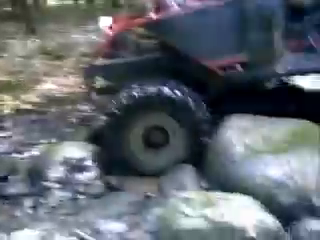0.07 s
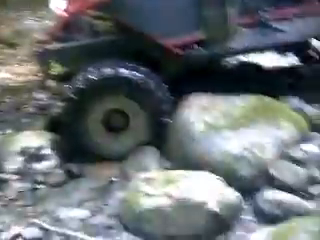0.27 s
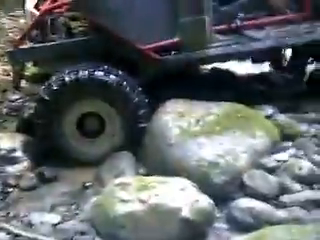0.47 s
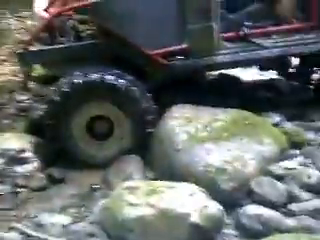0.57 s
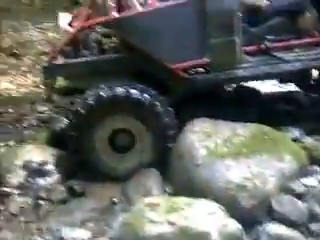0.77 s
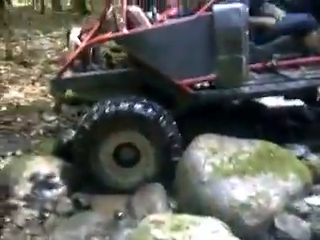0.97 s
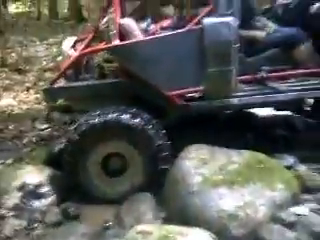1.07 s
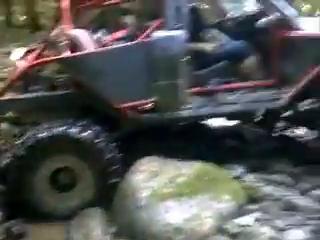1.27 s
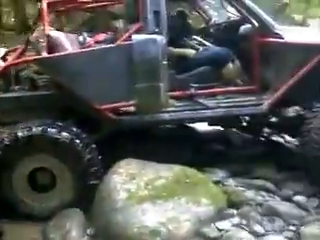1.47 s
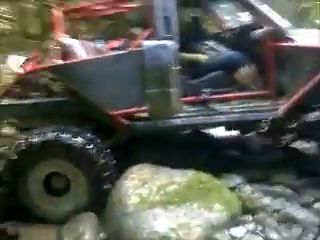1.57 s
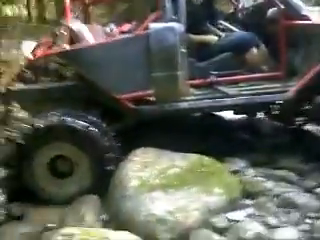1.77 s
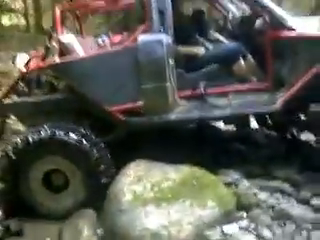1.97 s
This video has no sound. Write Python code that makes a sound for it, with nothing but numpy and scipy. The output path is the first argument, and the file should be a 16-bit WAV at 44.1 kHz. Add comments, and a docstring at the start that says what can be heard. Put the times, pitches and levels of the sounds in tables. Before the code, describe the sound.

Off-road buggy engine gives two deep throaty revs, drops to a low idle, then picks up slightly

```python
"""The exhaust of an eight-cylinder off-road buggy, blipped twice, dropping to idle and picking up again.
Harmonics locked to the firing rate give the note; two banks firing in uneven order add a beat, and random
differences between firings add rumble. Gas roar and clatter are noise pulsed by the firings; body resonances, a
loose metal part and panels are decaying modes set ringing by impacts. Behind them runs a steady wash of fan,
belts and gears with a few narrow-band tones, the lowest a ring of the exhaust pipe."""
import sys
import numpy as np
from scipy import signal
from scipy.fft import rfft, irfft, next_fast_len
from scipy.io import wavfile
from scipy.ndimage import uniform_filter1d, map_coordinates

SR = 44100
rng = np.random.default_rng(int(sys.argv[2]) if len(sys.argv) > 2 else 0)


def materialize(psi):
    """Save the field psi as 16-bit PCM at rate SR to the path in sys.argv[1].

    A 1-D psi becomes a single channel; in a 2-D psi each row is a channel.
    """
    bounded = np.clip(np.atleast_2d(psi).T, -1, 1)
    quanta = np.round(bounded * 32767).astype(np.int16)
    wavfile.write(sys.argv[1], SR, quanta)


N = 88420
MAX_FIRINGS = 400  # random values drawn per firing, more than the scene needs

# Engine speed and exhaust: t/s, firing rate f/Hz, mean rms level of the note/dB
ENGINE_COURSE = [(0.03, 87.24, -7.5), (0.122, 88.16, -12), (0.204, 90.1, -11), (0.232, 86.77, -13.5),
                 (0.364, 67.3, -29), (0.392, 64.42, -27), (0.446, 67.95, -16), (0.512, 81.26, -8.5),
                 (0.528, 83.53, -11), (0.65, 94.9, -10.5), (0.758, 103.4, -10.5), (0.808, 102.5, -12),
                 (0.868, 95.47, -12.5), (0.928, 83.7, -20.5), (1.022, 63.9, -23.5), (1.06, 58.7, -31),
                 (1.208, 51.2, -33), (1.296, 48.6, -31.5), (1.406, 51.2, -29.5), (1.648, 51.66, -29),
                 (1.802, 65.9, -25), (1.856, 70.9, -25), (2.0, 76.0, -29.5)]
# Broadband sources, relative levels: t/s, rumble/dB, roar under load/dB, clatter/dB
NOISE_COURSE = [(0, -30, -24, -43), (.13, -33, -27, -42), (.2, -21.5, -28.5, -46.5), (.3, -23.5, -35, -50),
                (.4, -25.5, -39, -49.5), (.45, -25, -25.5, -41), (.53, -25, -24.5, -38),
                (.72, -28, -26, -40), (.78, -22.5, -30.5, -43.5), (.9, -24, -31, -48),
                (1.03, -24.5, -40.5, -51.5), (1.2, -28, -48.5, -53), (1.45, -25.5, -46, -52),
                (1.54, -27, -39, -52), (1.64, -28, -32.5, -50.5), (1.72, -23.5, -41, -50.5),
                (2, -25, -41.5, -53)]
# Resonances of the body: f/Hz, half-width at half gain/Hz, peak gain added to a flat floor/dB
BODY_MODES = [(706, 50, -5), (1329, 520, -4.5), (1942, 190, -4.5)]
# Modes of a body panel: multiple of the pitch, mean level/dB, t60/s
PANEL_MODES = [(1, 0, 0.039), (.86, -5, 0.036)]


def exhaust():
    """Phase-locked harmonics superpose into one pressure dip per firing; uneven bank order adds subharmonics."""
    # Harmonics of the firing rate: t/s, second/dB, third/dB, beat of the banks/dB
    overtone_course = [(0, -33, -46, -20.5), (.25, -28.5, -45, -24), (.4, -30, -40, -24.5),
                       (.6, -30.5, -43, -22.5), (.85, -36, -48.5, -22.5), (1.0, -35, -43, -28),
                       (1.15, -35, -35, -34), (1.26, -40.5, -35, -33.5), (1.32, -29, -44, -32.5),
                       (1.47, -24.5, -32, -28), (1.62, -27, -34, -32), (1.72, -24, -30.5, -27),
                       (1.82, -27.5, -33.5, -30), (1.88, -32.5, -39, -29), (2, -33.5, -41.5, -32.5)]
    # Bank of each successive firing: left 1, right -1
    bank_order = [1, -1, -1, 1, -1, 1, 1, -1]
    # Filter the beat passes through: f/Hz, gain/dB
    pipe_response = [(30, -30.5), (58, -3), (100, -6.5), (140, -1.5), (168, 1), (200, -16), (400, -39.5)]
    note_waver_db, uneven_db, bank_scatter_db = 0.7, 1.56, 1.5
    slip_turns = 0.03  # phase wander, in turns of the firing cycle

    count, note_db = firings(), curves(ENGINE_COURSE)[1]
    second_db, third_db, beat_db = curves(overtone_course)
    hard_db = uneven_db * map_coordinates(rng.standard_normal(MAX_FIRINGS), [count], order=1)
    harmonics = [
        (1, note_db + note_waver_db * wobble(18)),
        (2, second_db + hard_db),
        (3, third_db + hard_db),
    ]
    pulses = np.zeros(N)
    for k, db in harmonics:
        turns = k * count + slip_turns * k * wobble(14)
        pulses -= amp(db) * np.cos(2 * np.pi * turns)
    scatter = amp(bank_scatter_db * rng.standard_normal(MAX_FIRINGS))
    banks = np.resize(bank_order, MAX_FIRINGS) * scatter
    beat = unit(coloured(kicks(banks), pipe_response))
    return np.sqrt(2) * pulses + amp(beat_db) * beat


def rumble():
    """Cycle-to-cycle variation: random firing impulses and noise excite the same low-pitched response."""
    # Response to thumps and wash: f/Hz, relative gain/dB
    rumble_response = [(30, -22), (48, -5.5), (70, -4), (110, -5.5), (165, -0.5), (200, -9.5), (260, -15.5),
                       (450, -34.5), (600, -61.5)]
    thumps = unit(coloured(kicks(rng.standard_normal(MAX_FIRINGS)), rumble_response))
    wash = unit(coloured(rng.standard_normal(N), rumble_response))
    return amp(curves(NOISE_COURSE)[0] - 3.0) * unit(thumps + 1.8 * wash)


def roar():
    """Amplitude-modulated flow noise, coloured by pipe and body, with brighter clatter of the running gear."""
    # Gas roar under load, before the body resonances: f/Hz, relative spectral density/dB
    roar_spectrum = [(150, -23), (220, 1.5), (280, 2), (400, 1), (520, -4), (704, -3), (900, -5),
                     (1300, -4), (1760, -9.5), (2230, -9), (2550, -5), (2860, -14.5), (3200, -21.5),
                     (4200, -51)]
    # Clatter: f/Hz, relative spectral density/dB
    clatter_spectrum = [(1710, -29), (2900, -2.5), (3320, -6.5), (3710, 1), (4530, -5), (5780, -6.5),
                        (6560, -11.5), (7100, -25), (9230, -47), (15600, -120)]
    _, roar_db, clatter_db = curves(NOISE_COURSE)
    rush = coloured(puffed(steady=1.4, scatter_db=2.5, cycle_db=1.0), roar_spectrum)
    rush = patchy(resonant(rush, BODY_MODES, floor=1), depth_db=2.5)
    clatter = coloured(puffed(steady=1.5, scatter_db=3, cycle_db=0.8), clatter_spectrum)
    clatter = patchy(clatter, depth_db=2.0)
    return amp(roar_db - 1.5) * unit(rush) + amp(clatter_db) * unit(clatter)


def shudder():
    """Impulsive excitation of modes: each firing, a little late, rings a body resonance, harder under load."""
    over_roar_db, spread_db = 2, 2.5
    pitch_spread = 0.079  # largest deviation, as a share of the pitch
    latest_s = 0.006
    at = np.flatnonzero(np.diff(np.floor(firings())))
    late, size, which, pitch = rng.random((len(at), 4)).T
    mode = (which * len(BODY_MODES)).astype(int)
    hz = np.transpose(BODY_MODES)[0][mode] * (1 + pitch_spread * (2 * pitch - 1))
    # The logarithm of a uniform draw makes a few firings much stronger than the rest
    db = curves(NOISE_COURSE)[1][at] + over_roar_db - spread_db * np.log(size + 0.0013)
    return struck(zip(at / SR + latest_s * late, db, hz), PANEL_MODES, tick=0.5)


def rattle():
    """Impact excitation: a loose metal part strikes the frame and body panels knock, each ringing in its modes."""
    # Strikes of the loose part: t/s, relative level/dB, pitch f/Hz
    rattle_strikes = [(0.001, -19.5, 2535), (0.0263, -15, 2490), (0.0372, -14, 2450), (0.0958, -16.5, 2467),
                      (0.1191, -15.5, 2425), (0.1303, -20, 2436), (.152, -24.5, 2450), (0.185, -24, 2560),
                      (0.4752, -19.5, 2524), (0.5337, -17.5, 2546), (.546, -21, 2500),
                      (0.5727, -19.5, 2560), (0.6068, -23, 2460), (0.6232, -17.5, 2520),
                      (0.6396, -23, 2600), (0.6645, -20, 2510), (0.7060, -19, 2559), (.7392, -24.5, 2449)]
    # Modes of the loose part: multiple of the pitch, mean level/dB, t60/s
    tin_modes = [(1, 3.5, 0.044), (1.06, -6, .025), (1.62, -10.5, 0.03)]
    # Knocks of the panels: t/s, relative level/dB, pitch f/Hz
    panel_knocks = [(0.0164, -8.5, 1407), (0.04, -18, 726), (0.1765, -19, 1394), (.187, -19.5, 700),
                    (0.4444, -17.5, 1384), (.4823, -19.5, 1244), (0.511, -13.5, 710), (0.539, -16.5, 698),
                    (.5467, -17.5, 1340), (0.569, -15.5, 1350), (0.5945, -15, 1288), (.6, -16.5, 744),
                    (0.627, -18.5, 680), (0.683, -15, 765), (0.709, -15.5, 1403), (1.544, -24.5, 756),
                    (1.625, -21, 760), (1.635, -23, 1360), (1.66, -25.5, 880)]
    return struck(rattle_strikes, tin_modes, tick=0.48) + struck(panel_knocks, PANEL_MODES, tick=0.15)


def running():
    """Narrow-band noise is heard as fuzzy tone: the exhaust pipe rings near 166 Hz, and fan, belts and gears
    give a few higher ones, over an even wash."""
    # Even wash: f/Hz, relative spectral density/dB
    wash_spectrum = [(180, -31.5), (300, 0.5), (335, -11.5), (366, -6), (533, -10), (732, -3.5), (1190, -9),
                     (1340, -5.5), (1730, -9.5), (2030, -7.5), (3200, -24), (4160, -52.5), (7040, -120)]
    # Fuzzy tones: f/Hz, half-width at half gain/Hz, level before the shared course/dB
    whine_bands = [(166.5, 8.1, -36), (761, 18, -48), (885.5, 8, -46), (2005, 8, -51.5)]
    # Course shared by all the tones: t/s, gain/dB
    whine_course = [(0, 0), (.98, 0.5), (1.03, 5.5), (1.27, 3), (1.32, -4), (1.5, -3.5), (1.63, 4),
                    (1.72, -2), (2, 2)]
    wash = amp(-36) * unit(coloured(rng.standard_normal(N), wash_spectrum))
    tones = np.zeros(N)
    for hz, width, db in whine_bands:
        band = resonant(rng.standard_normal(N), [(hz, width, 0)], floor=0)
        tones += amp(db + 2.3 * wobble(3.5)) * unit(band)
    return wash + amp(curves(whine_course)[0]) * tones


def firings():
    """Phase is the integral of frequency: the running count of cylinder firings."""
    return np.cumsum(curves(ENGINE_COURSE)[0]) / SR


def kicks(sizes):
    """Impulse train: one sample of the given size whenever the firing count passes an integer."""
    out = np.zeros(N)
    at = np.flatnonzero(np.diff(np.floor(firings())))
    out[at] = sizes[:len(at)]
    return out


def puffed(steady, scatter_db, cycle_db):
    """Amplitude modulation: noise swells at each firing and once per engine cycle."""
    cylinders, puff_s, cycle_lag = 8, 0.015, 0.46  # firings per cycle; 1/e decay in s; lag in cycles
    t = np.arange(SR // 20) / SR
    sizes = amp(scatter_db * rng.standard_normal(MAX_FIRINGS))
    puffs = signal.fftconvolve(kicks(sizes), np.exp(-t / puff_s))[:N]
    swell = amp(cycle_db * np.cos(2 * np.pi * (firings() / cylinders - cycle_lag)))
    return rng.standard_normal(N) * (steady + unit(np.abs(puffs))) * swell


def struck(events, modes, tick):
    """Modal synthesis: each impact is a sum of decaying sinusoids with a little contact noise."""
    out = np.zeros(N + SR)
    t = np.arange(SR // 8) / SR
    onset = 1 - np.exp(-t / 0.0011)
    for s, db, hz in events:
        ring = np.zeros(len(t))
        for multiple, level, t60 in modes:
            decay = amp(level + rng.normal(0, 0.91) - 60 * t / t60)
            ring += decay * np.sin(2 * np.pi * (multiple * hz * t + rng.random()))
        noise = tick * amp(-60 * t / 0.04) * rng.standard_normal(len(t))
        out[round(s * SR):][:len(t)] += amp(db - 0.97) * (ring + noise) * onset
    return coloured(out[:N], [(400, -9), (650, 0), (5000, -6), (6800, -15)])


def coloured(x, points):
    """Linear filtering: x through a spectrum of (f/Hz, gain/dB) points, closed outside them."""
    m = next_fast_len(N + 8192)
    f, db = np.transpose(points)
    log_f = np.log(np.fft.rfftfreq(m, 1 / SR) + 1)
    gain_db = np.interp(log_f, np.log(f + 1), db, left=-120, right=-120)
    return irfft(rfft(x, m) * amp(gain_db), m)[..., :N]


def resonant(x, peaks, floor):
    """Resonance: x through bell-shaped peaks (f/Hz, half-width/Hz, gain/dB) over a flat floor."""
    m = next_fast_len(N)
    f = np.fft.rfftfreq(m, 1 / SR)
    gain = floor + sum(amp(db) / (1 + ((f - centre) / width) ** 2) for centre, width, db in peaks)
    return irfft(rfft(x, m) * gain, m)[:N]


def patchy(x, depth_db):
    """Spectro-temporal modulation: random patches of gain in time and frequency."""
    z = signal.stft(x, nperseg=512)[2]
    field = uniform_filter1d(rng.standard_normal(z.shape), size=3, axis=0)
    field = uniform_filter1d(field, size=5, axis=1)
    return signal.istft(z * amp(depth_db * unit(field)), nperseg=512)[1][:N]


def wobble(rate):
    """Slow random modulation: a smooth curve through random knots, rate of them a second."""
    knots = rng.standard_normal(int(N * rate / SR) + 4)
    return map_coordinates(knots, [np.arange(N) * rate / SR])


def curves(rows):
    """Linear interpolation in time: one value per sample for each column after t/s."""
    s, *cols = np.transpose(rows)
    return [np.interp(np.arange(N) / SR, s, c) for c in cols]


def amp(db):
    """Amplitude ratio of a level: 20 dB per factor of ten."""
    return 10 ** (np.asarray(db) / 20)


def unit(x):
    """Normalisation to an rms of 1."""
    return x / np.sqrt(np.mean(x ** 2) + 1e-20)


def scene():
    """Superposition: the pressures of all sources add at one microphone."""
    return (exhaust() + rumble() + roar() + shudder() + rattle() + running())[None]


def record(dry):
    """Band limits and saturation: the microphone loses deep bass, rounds loud peaks and cuts the top."""
    bass_hz, top_hz = 35.3, 7250
    ceiling = 0.76  # amplitude that the rounded peaks approach
    m = next_fast_len(N + 8192)
    f = np.fft.rfftfreq(m, 1 / SR)
    x = irfft(rfft(dry, m) / np.sqrt(1 + (bass_hz / (f + 1)) ** 6), m)
    x = x / (1 + np.abs(x / ceiling) ** 4) ** (1 / 4)
    return irfft(rfft(x) * (f < top_hz), m)[..., :N]


dry = scene()
out = record(dry)
materialize(out)
```